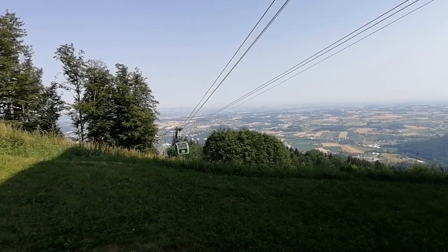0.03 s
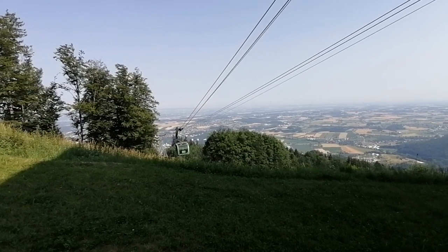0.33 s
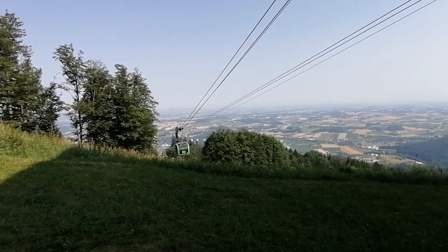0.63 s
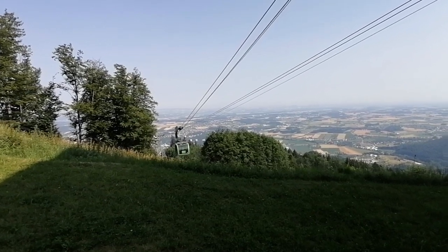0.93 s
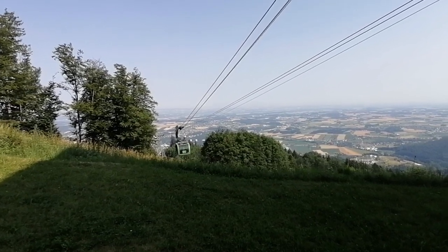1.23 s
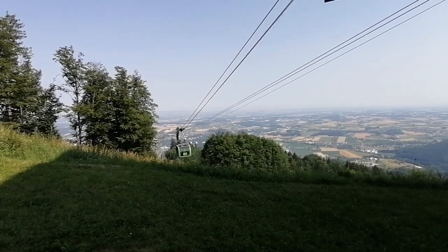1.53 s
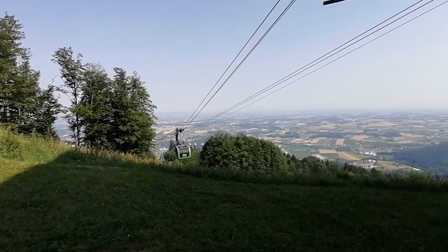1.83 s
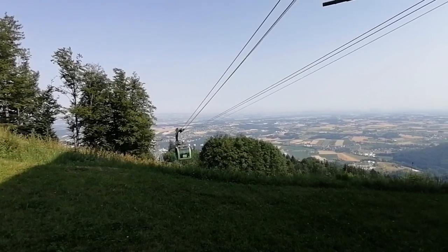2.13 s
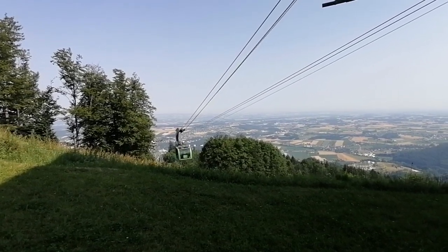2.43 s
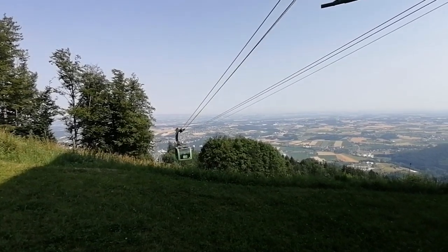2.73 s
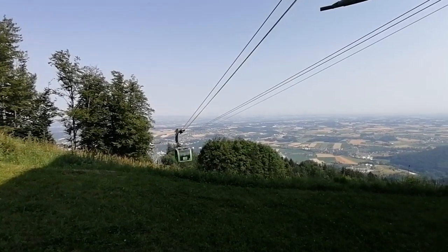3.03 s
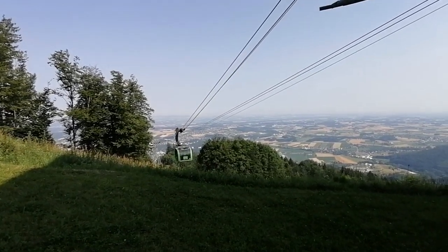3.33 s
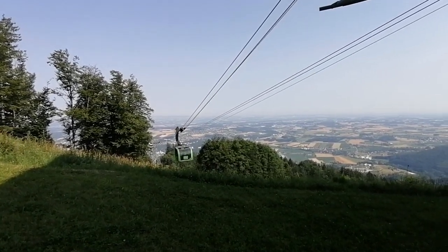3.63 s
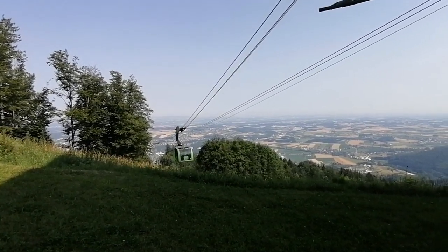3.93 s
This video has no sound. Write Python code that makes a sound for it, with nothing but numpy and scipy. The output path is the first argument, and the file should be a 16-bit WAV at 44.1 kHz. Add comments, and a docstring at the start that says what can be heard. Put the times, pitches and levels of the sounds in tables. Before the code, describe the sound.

A cable car's rope hums on the right, swelling unevenly and slowly sinking in pitch over the dull roar of its rollers. Light wind hisses in the trees and nudges the microphone, with faint birds far off on the slope.

```python
"""Cableway over a mountain slope.

The rope hums to the right, slowly sinking in pitch and swelling as its partials meet resonances,
over the dull roar of the running gear. Light wind hisses in the trees, rustles leaves and nudges
the microphone. Far birds chirp and call; a very faint high whine and tiny sweeps sit on top."""
import sys
import numpy as np
from scipy import signal
from scipy.fft import rfft, irfft, next_fast_len
from scipy.io import wavfile
from scipy.ndimage import map_coordinates

SR = 44100
rng = np.random.default_rng(int(sys.argv[2]) if len(sys.argv) > 2 else 0)


def store_pcm(level_fs):
    """Save levels as 16-bit WAV."""
    pcm = np.round(np.clip(level_fs, -1, 1) * 32767).astype(np.int16)
    wavfile.write(sys.argv[1], SR, np.atleast_2d(pcm).T)


N = 176400
TIME_S = np.arange(N) / SR


def amp(db):
    return 10 ** (np.asarray(db) / 20)


def unit(x):
    """Scale to rms 1."""
    return x / np.sqrt(np.mean(x ** 2) + 1e-20)


def curve(rows):
    """One value per sample from (time [s], value) rows."""
    return np.interp(TIME_S, *np.transpose(rows))


def wobble(knots_per_s):
    """Smooth random curve, rms near 1."""
    return map_coordinates(rng.standard_normal(2048), [TIME_S * knots_per_s + 2], mode="mirror")


def bell(centre_s, sigma_s, peak_db):
    """Gaussian swell of gain."""
    return amp(peak_db) * np.exp(-.5 * ((TIME_S - centre_s) / sigma_s) ** 2)


def filtered(x, response):
    """Apply a complex gain, response(hz)."""
    size = next_fast_len(N + SR // 2)
    return irfft(rfft(x, size) * response(np.fft.rfftfreq(size, 1 / SR)), size)[..., :N]


def noise(spectrum):
    """Noise of rms 1 from (frequency [Hz], relative density [dB]) rows."""
    knots_hz, db = np.transpose(spectrum)
    colour = lambda hz: amp(np.interp(np.log(hz + 1), np.log(knots_hz), db))
    return unit(filtered(rng.standard_normal(N), colour))


def stereo_noise(spectrum):
    """Independent noise per channel."""
    return np.array([noise(spectrum), noise(spectrum)])


def pan(left_minus_right_db):
    """Left and right gains, mean 1."""
    gains = amp(left_minus_right_db * np.array([[.5], [-.5]]))
    return gains / gains.mean(axis=0)


def from_right(x, pan_db, lag_s=0.00036):
    """Source on the right: later and weaker at the left microphone port."""
    delays = lambda hz: np.exp(1j * np.pi * hz * lag_s * np.array([[-1], [1]]))
    return pan(pan_db) * filtered(x, delays)


def faint_treble():
    """Microphone hiss, a whine of three beating tones and a run of small downward sweeps."""
    # (frequency [Hz], relative density [dB])
    hiss_spectrum = [(3000, -13), (6500, 7.5), (8200, 0.5), (9300, -0.5), (10700, -2.5), (11300, -6.5),
                     (15000, -9.5)]
    whine_hz, spacing_hz = 10800, 42
    sweep_top_hz, fall_hz, sweeps_per_s, rise_db = 11760, 470, 11.8, 6
    hiss = amp(-82) * noise(hiss_spectrum)
    whine = sum(unit(np.sin(2 * np.pi * ((whine_hz + k * spacing_hz) * TIME_S + rng.random())))
                for k in (-1, 0, 1))
    progress = (sweeps_per_s * TIME_S + .18 * wobble(7)) % 1
    tone = np.sin(2 * np.pi * np.cumsum(sweep_top_hz - fall_hz * progress) / SR)
    sweeps = unit(tone * amp(rise_db * progress) * np.sqrt(np.abs(np.sin(np.pi * progress))))
    sweep_db = -104.5 + 2.5 * TIME_S + wobble(14)
    return pan(-2) * (hiss + amp(-102.5) * whine + amp(sweep_db) * sweeps)


def bird_note(start_s, length_s, start_hz, end_hz, db, rasp_hz):
    """Gliding whistle, roughened by fast pitch jitter."""
    attack_share = 0.075
    progress = np.clip((TIME_S - start_s) / length_s, 0, 1)
    hz = start_hz + (end_hz - start_hz) * progress + rasp_hz * wobble(260)
    envelope = np.sqrt(2 * np.minimum(progress / attack_share, 1) * np.sqrt(1 - progress))
    return amp(db) * envelope * np.sin(2 * np.pi * np.cumsum(hz) / SR)


def birds():
    """Thin chirps and lower, hoarse calls, with a short echo from the forest edge."""
    # both: (time [s], length [s], start pitch [Hz], end pitch [Hz], level [dB])
    chirps = [(.72, .03, 6650, 6100, -84), (.749, .014, 5850, 5600, -74), (.777, .019, 5500, 5450, -82),
              (.796, .017, 5600, 5950, -67.5), (.809, .028, 6050, 6650, -72.5),
              (.925, .028, 5800, 5700, -84), (1.004, .023, 5650, 6050, -75.5)]
    calls = [(2.729, .08, 1060, 1115, -63), (2.82, .055, 1100, 1140, -75), (3.197, .055, 1060, 1075, -64.5)]
    echo_db, echo_t60_s = -4.5, .8
    song = sum(bird_note(*row, rasp_hz=70) for row in chirps)
    song += sum(bird_note(*row, rasp_hz=38) for row in calls)
    tail = rng.standard_normal((2, SR)) * amp(-60 * TIME_S[:SR] / echo_t60_s)
    echo = signal.fftconvolve(song[None], tail / np.linalg.norm(tail[0]), axes=1)[:, :N]
    return pan(4.5) * song + amp(echo_db) * echo


def leaves():
    """Nearby leaves rustle brightly in light gusts, much alike at both ports."""
    # (time [s], level [dB])
    gusts = [(0, -80), (.75, -81.5), (.98, -89), (1.25, -87), (1.38, -78), (1.6, -83), (1.95, -87),
             (2.13, -83), (2.35, -93), (2.68, -100), (2.83, -81), (3.06, -75.5), (3.25, -82), (3.6, -82),
             (4, -87)]
    # (frequency [Hz], relative density [dB])
    spectrum = [(500, -25), (1500, -6), (3000, 2), (4500, -3), (6800, -3), (8200, -8), (9500, -6),
                (11000, -12), (12000, -24), (15000, -30)]
    return pan(-1) * amp(curve(gusts)) * unit(noise(spectrum) + .5 * stereo_noise(spectrum))


def tree_wind():
    """Wind in the trees: an even hiss with soft midrange swells."""
    # both: (frequency [Hz], relative density [dB])
    hiss_spectrum = [(200, -2), (700, 9.5), (1200, 2), (1600, 0.5), (2150, 5), (3200, -1), (5000, -5.5),
                     (6800, -15), (8200, -53.5), (11000, -17), (12000, -28), (15000, -35.5)]
    swell_spectrum = [(600, -31), (1050, -3), (1400, 0), (1750, -7), (2600, -28.5), (8000, -49)]
    # (time [s], sigma [s], peak level [dB])
    swells = [(1.33, 0.12, -68.5), (2.38, 0.23, -72.5), (3.93, 0.11, -73)]
    hiss = stereo_noise(hiss_spectrum) * amp(-66.5 + 0.22 * wobble(0.53))
    swelling = stereo_noise(swell_spectrum) * sum(bell(*row) for row in swells)
    return pan(-1) * (hiss + swelling)


def microphone_wind():
    """Wind on the ports: a lumpy, slowly growing rumble with soft bumps."""
    # (frequency [Hz], relative density [dB])
    spectrum = [(15, -8.5), (30, 3.5), (60, 3), (100, -4.5), (200, -20.5), (500, -63.5), (2000, -100)]
    # (time [s], peak level [dB])
    bumps = [(.095, -49), (.43, -53), (.55, -53), (.95, -51), (1.08, -51), (1.45, -48), (1.81, -53),
             (2.78, -46), (3.735, -49)]
    growth_db_per_s, bump_sigma_s = 1, .016
    rumble = amp(-60 + growth_db_per_s * (TIME_S - 2) + 1.6 * wobble(15)) * stereo_noise(spectrum)
    eddies = noise(spectrum)
    for centre_s, db in bumps:
        push = bell(centre_s, bump_sigma_s, db)
        rumble += unit(push * eddies) * push.std()
    return pan(-2) * rumble


def running_gear():
    """Rolling sheaves roar, ring and whine, slowly fading; the slope scatters some roar back."""
    # (frequency [Hz], relative density [dB])
    spectrum = [(60, -8), (120, 5.5), (165, 6), (200, -4), (240, 7.5), (310, -5.5), (400, -3.5), (480, -3),
                (570, -0.5), (680, -0.5), (760, -11.5), (900, -10.5), (1100, -22), (1400, -26),
                (2200, -25.5), (4000, -65.5), (8000, -100)]
    # before the fade: (centre [Hz], width [Hz], level at 2 s [dB], growth [dB/s])
    resonances = [(203.7, 16, -68.5, 4), (337.4, 22, -79, 4.5), (396.8, 12, -71, 0), (458.5, 16, -75.5, -2),
                  (557.5, 30, -64.5, 0), (827.7, 22, -73.5, -0.5), (960, 30, -79.5, 2.5),
                  (2456, 12, -97, 1.5), (2590, 13, -97.5, 0)]
    roar_db, whine_hz, fade_db_per_s = -53.5, 818, -1.16
    roar = amp(roar_db + 0.29 * wobble(3.6)) * noise(spectrum)
    for centre_hz, width_hz, db, growth_db_per_s in resonances:
        band = lambda hz: 1 / (1 + (2 * (hz - centre_hz) / width_hz) ** 2)
        ring = unit(filtered(rng.standard_normal(N), band))
        roar += amp(db + growth_db_per_s * (TIME_S - 2)) * ring
    whine_gain = amp(-70.3 + wobble(3.5))
    whine = whine_gain * unit(np.sin(2 * np.pi * whine_hz * TIME_S + .35 * wobble(11)))
    scattered = amp(roar_db - 13) * stereo_noise(spectrum)
    fade = amp(fade_db_per_s * (TIME_S - 2.5))
    return (from_right(roar + whine, pan_db=-9) + scattered) * fade


def rope():
    """The rope's sinking, juddering hum: partials 1-3 swell separately, 4-5 are weak and rough."""
    # (time [s], pitch [Hz])
    pitch = [(0, 138.8), (1, 130.6), (2, 121.6), (3, 114.6), (4, 105.8)]
    # partials 1-3: (time [s], level [dB])
    fundamental = [(0.0, -48), (0.04, -43.5), (.14, -44), (.33, -40), (.42, -41.5), (0.52, -37.5),
                   (0.69, -41), (0.72, -51), (.76, -42), (.92, -36.5), (0.935, -32.5), (1, -33.5),
                   (1.11, -39.5), (1.14, -47.5), (1.23, -38), (1.4, -37), (1.44, -42.5), (1.65, -43),
                   (1.84, -57), (1.94, -41), (2.0, -47), (2.04, -61), (2.09, -49.5), (2.2, -51), (2.4, -72),
                   (2.82, -75), (2.9, -48.5), (2.99, -47.5), (3.03, -62.5), (3.46, -65), (3.58, -48),
                   (3.82, -38.5), (4.0, -47)]
    octave = [(0, -58), (.15, -50.5), (.27, -57), (.4, -55.5), (.48, -42.5), (.56, -42.5), (.72, -64),
              (.82, -50.5), (.91, -70.5), (1.09, -54.5), (1.2, -58.5), (1.8, -55), (1.93, -43.5),
              (2, -49.5), (2.28, -48.5), (2.32, -66), (2.64, -68), (2.7, -56.5), (2.81, -50), (2.87, -85),
              (3.05, -55.5), (3.17, -58.5), (3.4, -60.5), (3.6, -63), (4, -67)]  # raised 0.5 dB below
    third = [(0, -63), (.95, -63), (1.05, -61.5), (1.17, -55), (1.4, -69.5), (2.15, -61), (2.4, -72.5),
             (2.65, -59.5), (2.85, -69), (4, -69)]
    # partials 4-5: (base level [dB])
    overtones_db = [-73.5, -71]
    # (time [s], left minus right [dB])
    fundamental_pan = [(0, -11), (.25, -15), (.5, -5.5), (1.3, -8.5), (2, -6), (4, -6)]
    wander_rad, judder_depth = .13, .07
    phase = 2 * np.pi * np.cumsum(curve(pitch)) / SR + wander_rad * wobble(6.17)

    def partial(k, flutter=.065):
        carrier = np.exp(1j * (k * phase + 2 * np.pi * rng.random()))
        modulation = 1 + flutter * (wobble(45) + 1j * wobble(45))
        return np.sqrt(2) * np.real(carrier * modulation)

    judder = np.sqrt(2) * (wobble(70) * np.cos(phase) + wobble(70) * np.sin(phase))
    low = amp(curve(fundamental)) * (partial(1) + judder_depth * judder)
    high = amp(curve(octave) + 0.5) * partial(2) + amp(curve(third)) * partial(3)
    for k, db in enumerate(overtones_db, 4):
        high += amp(db + wobble(4.1)) * partial(k, flutter=0.93)
    return from_right(low, pan_db=curve(fundamental_pan)) + from_right(high, pan_db=-13)


def scene():
    """Stereo mix as heard from the meadow."""
    cableway = rope() + running_gear()
    return cableway + tree_wind() + microphone_wind() + leaves() + birds() + faint_treble()


def record(dry):
    """Brick-wall low-pass."""
    cutoff_hz = 15250
    return filtered(dry, lambda hz: hz < cutoff_hz)


dry = scene()
out = record(dry)
store_pcm(out)
```